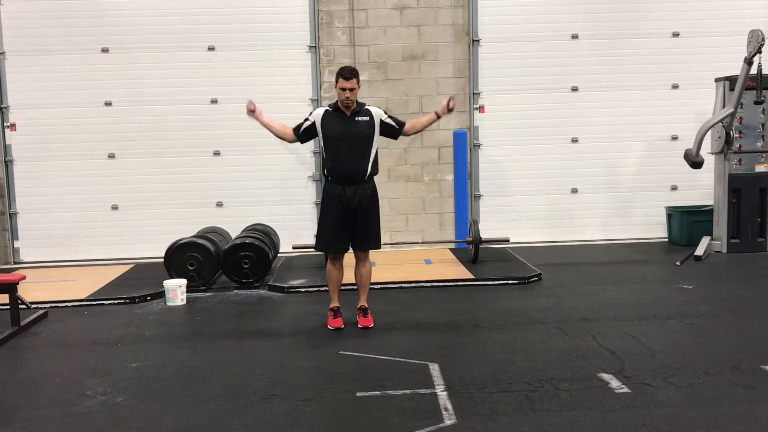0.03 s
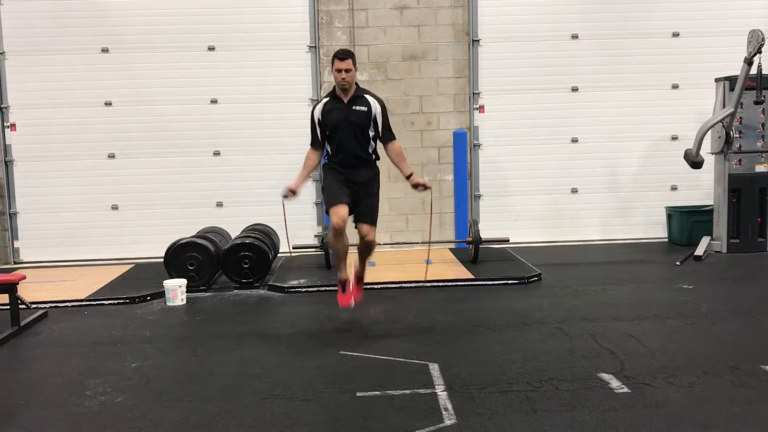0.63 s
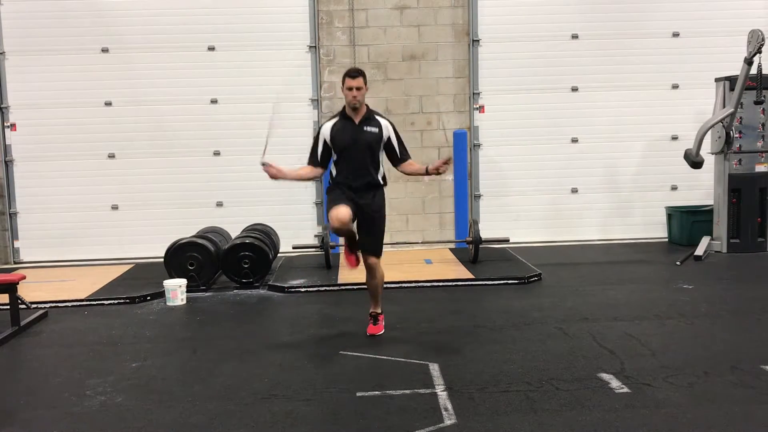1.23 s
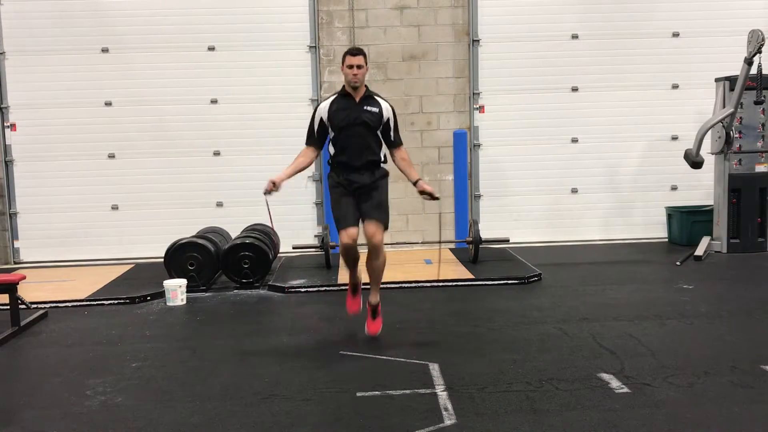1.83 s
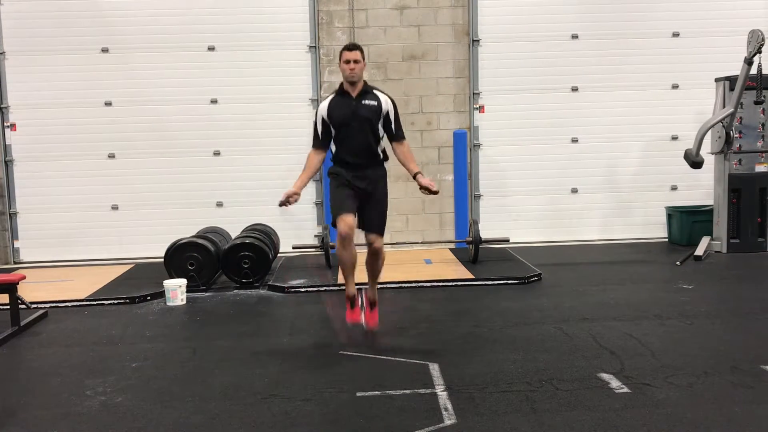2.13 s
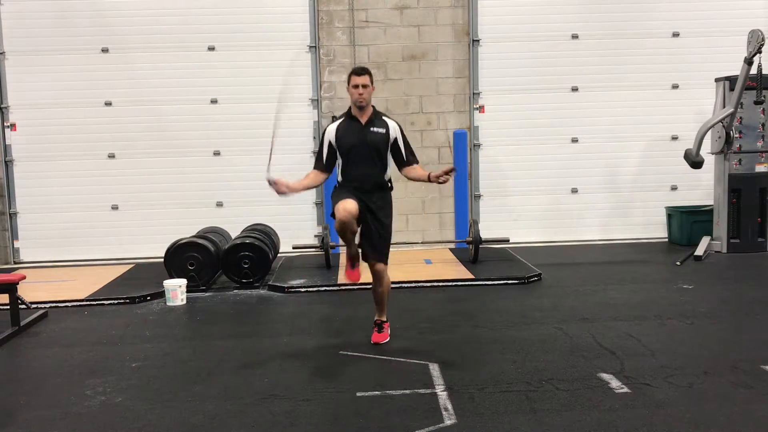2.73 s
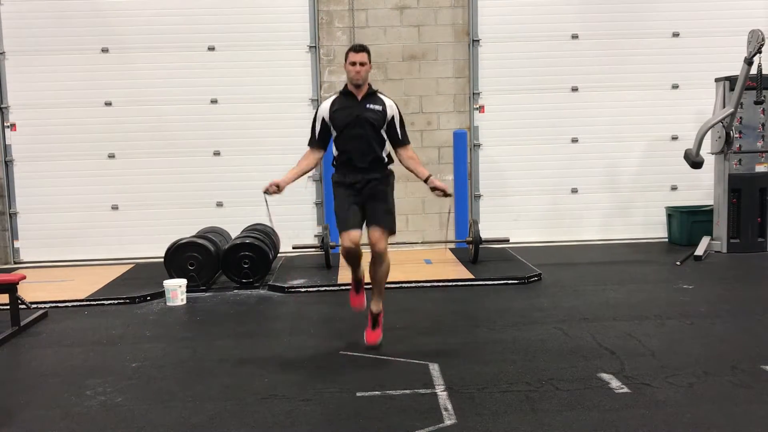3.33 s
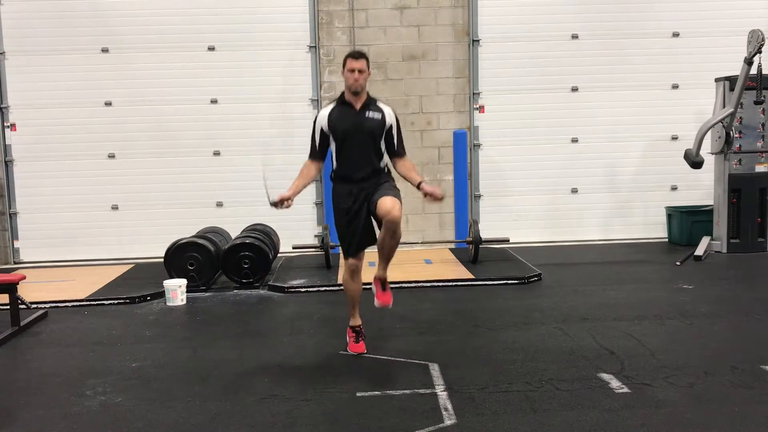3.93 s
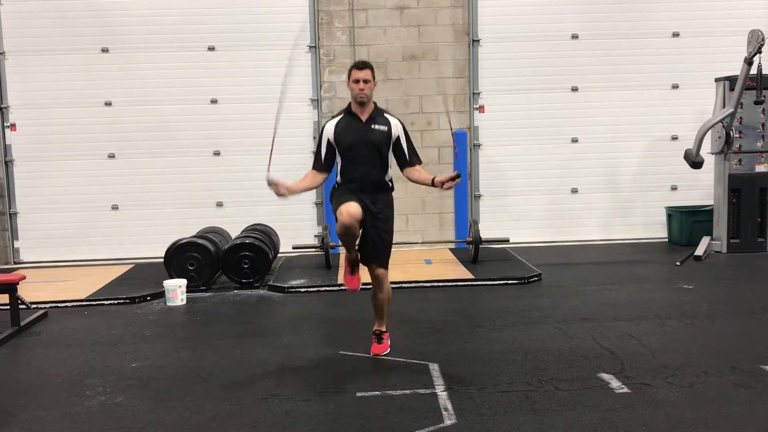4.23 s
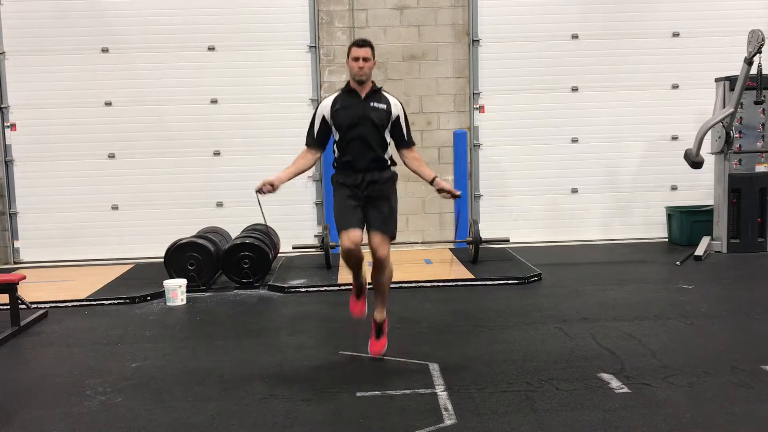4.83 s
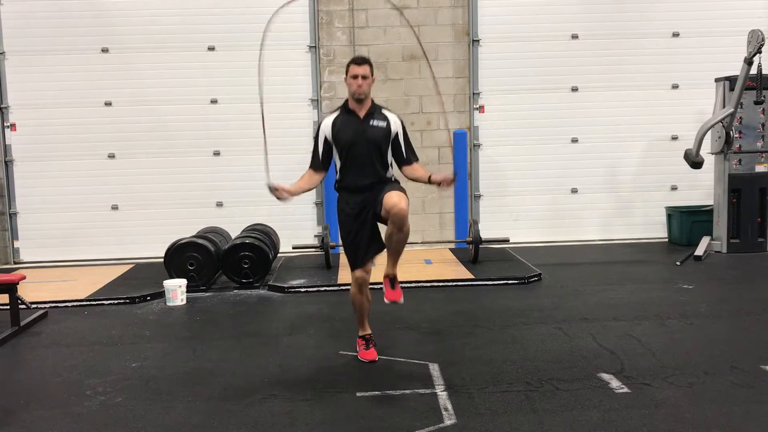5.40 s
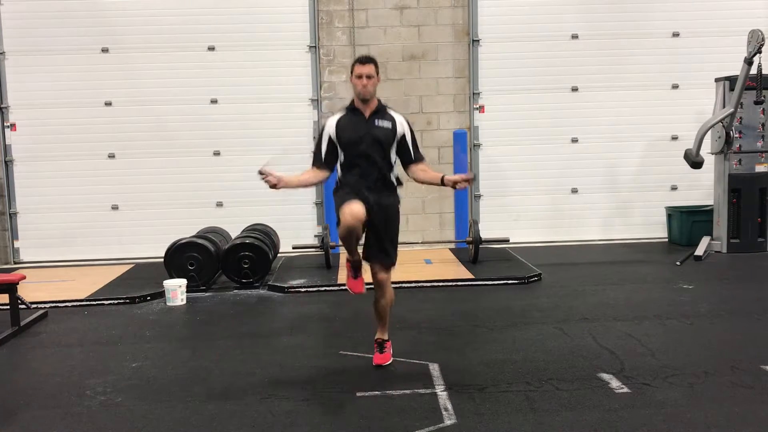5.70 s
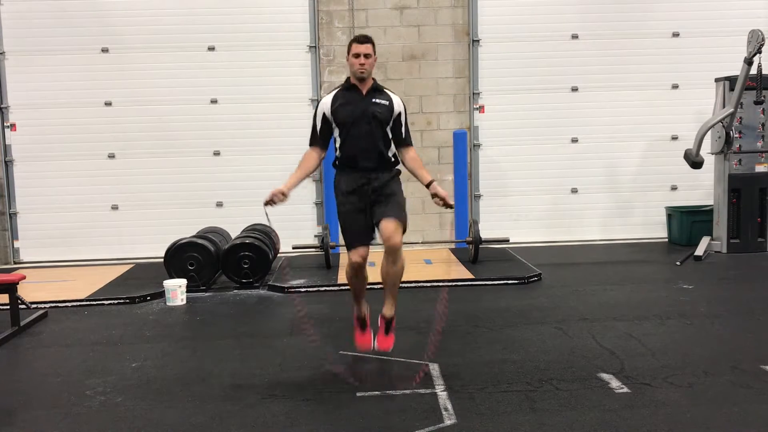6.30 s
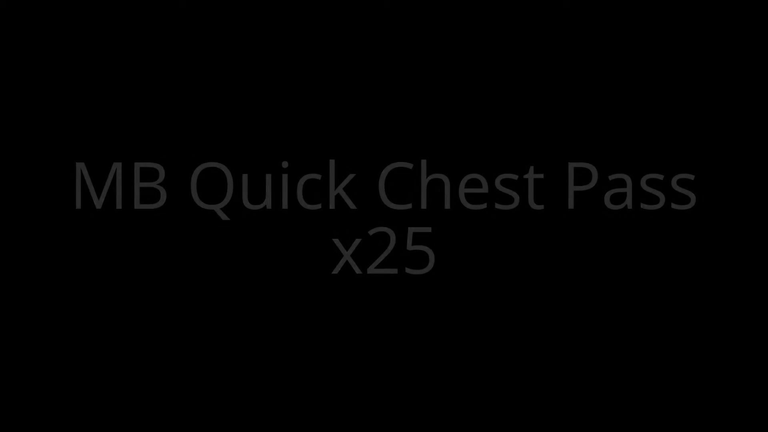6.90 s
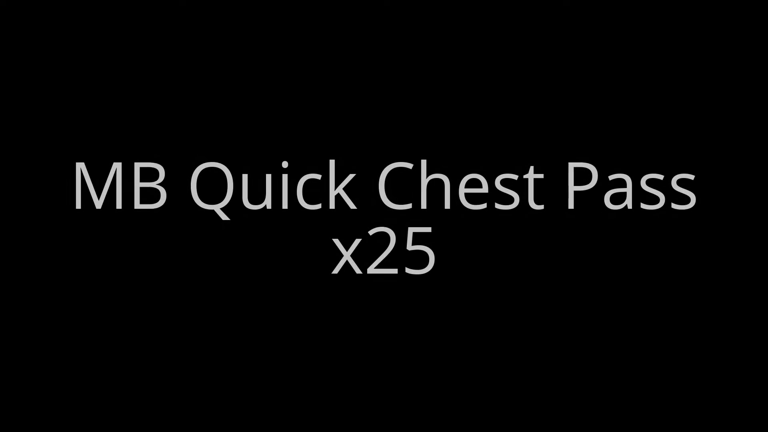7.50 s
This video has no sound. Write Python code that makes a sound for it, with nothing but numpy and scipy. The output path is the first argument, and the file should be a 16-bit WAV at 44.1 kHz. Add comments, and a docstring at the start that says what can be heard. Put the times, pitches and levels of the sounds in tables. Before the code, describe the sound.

A low ventilation hum fills a large, hard-walled gym. Someone starts skipping, and the rope whooshes, swishes down and slaps a rubber mat in an even rhythm, nearly three times a second. Soft footfalls follow most slaps, with light handle ticks and an occasional thin whistle. The microphone catches both the crisp hits and the room's echo. After sixteen turns, everything cuts off abruptly.

```python
"""A ventilation motor hums from the start in a large, hard-walled gym, where someone is skipping rope.
On each turn the rope whooshes through the air, swishes down, sometimes whistles, and slaps the rubber mat.
A soft footfall follows most slaps as the jumper steps from foot to foot, and the handles tick lightly.
The hall answers late with an echo. After sixteen turns, all the sound stops abruptly."""
import sys
import numpy as np
from scipy import signal
from scipy.fft import rfft, irfft, next_fast_len
from scipy.io import wavfile
from scipy.ndimage import uniform_filter1d

SR = 44100
rng = np.random.default_rng(int(sys.argv[2]) if len(sys.argv) > 2 else 0)


def master_out(mix):
    """Clip the mix to full scale and print it as 16-bit PCM to the path in sys.argv[1]."""
    frames = np.transpose(np.atleast_2d(mix))
    ceiling = np.clip(frames, -1, 1)
    pcm = np.round(ceiling * 32767).astype(np.int16)
    wavfile.write(sys.argv[1], SR, pcm)


N = 332955
TIME = np.arange(N) / SR
HIT_SIZE = 4096  # samples in one short hit
HIT_TIME = np.arange(HIT_SIZE) / SR
HIT_HZ = np.fft.rfftfreq(HIT_SIZE, 1 / SR)


def undb(db):
    """Turn decibels into a number to multiply by."""
    return 10 ** (np.asarray(db) / 20)


def unit(x):
    """Scale a sound to an average (rms) size of 1."""
    return x / np.sqrt(np.mean(x ** 2))


def along(points, hz):
    """Read between (pitch_hz, value) points, with octaves evenly spaced."""
    f, value = np.transpose(points)
    return np.interp(np.log(np.maximum(hz, 1)), np.log(f), value)


def bell(hz, centre_hz, width_hz):
    """A smooth hump of height 1."""
    return np.exp(-.5 * ((hz - centre_hz) / width_hz) ** 2)


def tint(x, gain):
    """Turn each frequency of a sound up or down by gain(hz)."""
    size = next_fast_len(len(x) + HIT_SIZE)
    return irfft(rfft(x, size) * gain(np.fft.rfftfreq(size, 1 / SR)), size)[:len(x)]


def noise(size, colour):
    """Steady noise with a colour: a balance of low and high pitches."""
    return unit(tint(rng.standard_normal(size), lambda f: undb(along(colour, f))))


def wander(size, width_hz):
    """A random wobble, mostly slower than width_hz."""
    return unit(tint(rng.standard_normal(size), lambda f: bell(f, 0, width_hz)))


def vortex_tone(hz, blur_hz):
    """A blurred tone: swirls of air leave the rope at a nearly regular rate."""
    phase = 2 * np.pi * np.cumsum(hz) / SR
    tone = wander(len(hz), blur_hz) * np.cos(phase) + wander(len(hz), blur_hz) * np.sin(phase)
    return tone / np.sqrt(2)


def ring(colour_db):
    """A filter of this colour that rings after a hit, never before it."""
    cepstrum = irfft(np.log(undb(colour_db)))
    return np.exp(rfft(np.r_[cepstrum[0], 2 * cepstrum[1:HIT_SIZE // 2]], HIT_SIZE))


def hit(decay_s, colour_db):
    """A burst of tiny contacts that starts 1 ms in and dies away."""
    since_s = HIT_TIME - .001
    fade = (since_s >= 0) * np.exp(-np.abs(since_s) / decay_s)
    burst = rfft(rng.standard_normal(HIT_SIZE) * fade)
    even_burst = burst / np.sqrt(uniform_filter1d(np.abs(burst) ** 2, size=100))
    return irfft(even_burst * ring(colour_db))


def add(track, start_s, sound):
    """Mix a sound into a track."""
    start = max(int(start_s * SR), 0)
    track[start:start + len(sound)] += sound[:N - start]


def taps(table, colour, decay_s, gain_db):
    """One short hit for each row of a table."""
    out = np.zeros(N)
    for start_s, level_db in table:
        add(out, start_s - .001, undb(level_db + gain_db) * hit(decay_s, along(colour, HIT_HZ)))
    return out


# Colour of the rumbling air: pitch_hz, gain_db
VENT_COLOUR = [(20, -33), (40, -4), (55, -2), (75, -5.5), (110, -2), (160, -1), (220, -10.5), (320, -16.5),
               (600, -19.5), (1100, -26.5), (2200, -34), (5000, -44.5), (10000, -52.5), (16000, -55)]
# Tones of the motor and its mains power: pitch_hz, level_db
HUM_TONES = [(41.0, -63), (58.35, -41), (116.7, -55), (120.0, -62)]
def ventilation(air_db=-44.5):
    """A slightly wavering motor hum over the steady rumble of moving air."""
    air = noise(N, VENT_COLOUR)
    hum = sum(undb(db) * np.sqrt(2) * np.sin(2 * np.pi * (hz * TIME + rng.random()))
              for hz, db in HUM_TONES)
    return air * undb(air_db + .5 * wander(N, 6)) + hum * undb(.4 * wander(N, 1))


# Colour of the echo: pitch_hz, gain_db
HALL_COLOUR = [(60, -3.5), (300, 6.5), (600, 11), (1000, 7), (3000, 9), (4300, 5), (6000, 7), (9300, 6.5),
               (11000, 2), (16000, -2)]
# Time the echo takes to fade by 60 dB: pitch_hz, fade_s
HALL_FADE = [(100, 0.61), (1000, 2.82), (3000, 1.266), (6000, 0.99), (9000, 0.83), (15000, 0.37)]
def hall(gap_s=.027, early_db=-12, wall_db=3, wall_s=.002, grain_db=3, merge_s=.098):
    """The echo of one click: weak scatter, then wall and roof together, then a fading tail."""
    t = TIME[:SR]
    f = np.fft.rfftfreq(SR, 1 / SR)
    echoes = rfft(rng.standard_normal(SR)) * undb(along(HALL_COLOUR, f)) / np.sqrt(SR)
    bands_hz, fades_s = np.transpose(HALL_FADE)
    tail = sum(irfft(echoes * along(np.c_[bands_hz, band], f)) * undb(-60 * t / fade_s)
               for band, fade_s in zip(np.eye(len(bands_hz)), fades_s))
    # the first echoes arrive one by one and only later merge
    tail *= undb(grain_db * np.exp(-t / merge_s) * wander(SR, 350))
    wall_boost = 1 + (undb(wall_db) - 1) * np.exp(-np.abs(t - gap_s) / wall_s)
    return tail * np.where(t < gap_s, undb(early_db), wall_boost)


# Ticks of the handles: start_s, relative_level_db
TICKS = [(.645, -32), (2.416, -24.5), (2.788, -15.5), (2.873, -25), (2.978, -21), (3.518, -18.5),
         (3.904, -17.5), (4.015, -33), (4.270, -17.5), (4.653, -20), (5.791, -18.5), (6.173, -18.5),
         (6.545, -21)]
# Colour of a tick: pitch_hz, gain_db
TICK_COLOUR = [(500, -27), (3000, -5), (6000, 1), (9500, 0.5), (13000, -5.5), (16000, -14)]
def handle_ticks():
    """The handles make light, bright contacts."""
    return taps(TICKS, TICK_COLOUR, decay_s=.0079, gain_db=-.5)


# Shoes landing: start_s, relative_level_db
STEPS = [(1.293, -6.5), (1.671, -14.5), (2.026, -9), (2.392, -14), (2.759, -13.5), (3.51, -11.5),
         (3.887, -12.5), (4.258, -7.5), (4.643, -19.5), (5.009, -9.5), (5.398, -13), (5.779, -8.5),
         (6.155, -8.5), (6.528, -6.5)]
# Colours of the sole's tap and the deep thud: pitch_hz, gain_db
SOLE_COLOUR = [(150, -5), (400, 1), (800, 3), (1600, -1.5), (2500, -11), (5000, -16.5), (15000, -26.5)]
THUD_COLOUR = [(40, -9.5), (80, 8), (160, 9), (350, 3.5), (700, -5), (3000, -39)]
def footfalls():
    """The sole taps the rubber and the jumper's weight adds a longer thud."""
    sole = taps(STEPS, SOLE_COLOUR, decay_s=.003, gain_db=-1)
    thud = taps(STEPS, THUD_COLOUR, decay_s=.021, gain_db=-4)
    return sole + thud


# The whoosh as the jumper's effort rises and eases: time_s, pitch_hz, relative_level_db
SWING = [(0.0, 263, -57.5), (1.0, 261, -54), (1.19, 371, -44), (1.48, 283, -50), (1.52, 371, -48),
         (1.59, 333, -47), (3.14, 321, -47), (3.27, 297, -53.5), (3.37, 405, -46.5), (3.45, 300, -49.5),
         (3.6, 367, -41), (3.71, 317, -48.5), (6.1, 309, -47), (6.36, 299, -51), (6.4, 332, -46.5),
         (6.8, 296, -51.5)]
def whoosh(blur_hz=22, bend=.07, bend_lead_s=.03, swell_db=1, swell_lead_s=.051, gain_db=-2):
    """The loop stirs the air: its fast middle sings highest, its slower sides lower."""
    time_s, hz, db = np.transpose(SWING)
    landings_s = np.transpose(SLAPS)[0]  # one turn per slap, listed below
    angle = lambda lead_s: 2 * np.pi * np.interp(TIME + lead_s, landings_s, np.arange(len(SLAPS)))
    # the rope is fastest just before it lands, so the pitch bends up once a turn
    pitch_hz = np.interp(TIME, time_s, hz) * (1 + bend * np.cos(angle(bend_lead_s)))
    # it swells twice a turn, going down and going up
    level_db = np.interp(TIME, time_s, db) + swell_db * np.cos(2 * angle(swell_lead_s))
    loop_parts = [(.8, -4), (.97, -1), (1.12, -2), (1.27, -5)]
    air = sum(undb(part_db) * vortex_tone(ratio * pitch_hz, blur_hz) for ratio, part_db in loop_parts)
    return unit(air) * undb(level_db + gain_db)


# Colour of the rope's hiss: pitch_hz, gain_db
HISS_COLOUR = [(2000, -4), (4000, 0.5), (6800, 2), (8500, -2.5), (11000, -7), (13000, -3), (16000, -14.5)]
# Thin whistles: start_s, length_s, first_pitch_hz, last_pitch_hz, level_db
WHISTLES = [(1.47, .11, 5900, 5370, -60), (2.618, 0.057, 6300, 5470, -57.5), (3.02, 0.031, 6000, 5720, -61),
            (4.11, 0.064, 5900, 5070, -56), (4.885, .04, 5800, 5300, -57), (6.385, 0.063, 5950, 4730, -56)]
def downswings(swish_s=.092, first_hz=6340, last_hz=5400, hiss_db=-2, hiss_hall_db=5):
    """The rope swishes down in falling pitch and sometimes whistles; returns (direct, to the hall)."""
    tone, hiss = np.zeros(N), np.zeros(N)
    swell = lambda size: np.sin(np.pi * np.linspace(0, 1, size) ** 1.3)
    size = int(swish_s * SR)
    for landing_s, *_, swish_db in SLAPS:
        loudness = undb(swish_db) * swell(size)
        swish = vortex_tone(np.linspace(first_hz, last_hz, size), blur_hz=600)
        add(tone, landing_s - swish_s, loudness * swish)
        add(hiss, landing_s - swish_s, loudness * noise(size, HISS_COLOUR))
    for start_s, length_s, from_hz, to_hz, level_db in WHISTLES:
        size = int(length_s * SR)
        whistle = vortex_tone(np.linspace(from_hz, to_hz, size), blur_hz=140)
        add(tone, start_s, undb(level_db) * swell(size) * whistle)
    return tone + undb(hiss_db) * hiss, tone + undb(hiss_hall_db) * hiss


# Colour of a slap: pitch_hz, gain_db
SLAP_COLOUR = [(150, -13), (400, -1.5), (800, 2), (2400, 0), (3600, 1), (6000, -1), (9000, -1.5),
               (12000, 0), (15000, 2.5)]
# The rope landing on the mat, once a turn (levels are relative):
# start_s, level_db, contact_s, smack_pitch_hz, body_db, snap_db, swish_db
SLAPS = [(0.7332, -7.5, .0028, 1213, -1.5, -5, -78), (1.203, -5, .0036, 1550, -4, -1, -57),
         (1.5778, -9, .002, 1440, -4, 0, -60), (1.946, -9.5, .0013, 1150, 1, 1, -58.5),
         (2.3162, -7.5, .002, 1500, 1, 3.5, -65), (2.6833, -3, .001, 1630, 1, -10, -59.5),
         (3.0567, -1.5, .0011, 1740, -2, -12.5, -59.5), (3.4207, -4.5, .006, 1406, 0.5, 0, -59),
         (3.7935, -4, .0022, 1450, -0.5, -1, -61), (4.172, -4.5, .0008, 1460, 3, 5, -58.5),
         (4.5453, -5, .0028, 1250, 2.5, -5, -66), (4.923, -3, .001, 1440, 1.5, 4.5, -61.5),
         (5.311, -6.5, .0024, 1620, 1.5, 2, -61.5), (5.6925, -6, .001, 1400, -1.5, 2, -62.5),
         (6.0743, -2, .0013, 1400, -1, 1, -60.5), (6.4459, -3.5, .0031, 1620, 1.5, -4, -62.5)]
def slaps(crackle_db=-5, crackle_s=.008, direct_db=-1, hall_db=-1.31, hall_follows=.37, clack_hz=3000):
    """The rope snaps on the mat, more of it lands, the rest lies down in a crackle; the hall answers."""
    out = np.zeros(N)
    lows = 1 / (1 + (HIT_HZ / 2200) ** 4)
    top_cut_db = -5 * (1 - 1 / (1 + (HIT_HZ / 10000) ** 8))
    colour = along(SLAP_COLOUR, HIT_HZ)
    snap_colour = along([(3000, -21), (8000, -18.5), (11500, -4.5), (15000, -2)], HIT_HZ)
    for start_s, level_db, contact_s, smack_hz, body_db, snap_db, _ in SLAPS:
        smack_db = 4 * bell(HIT_HZ, smack_hz, width_hz=330) + body_db * lows
        body_colour = colour + smack_db + top_cut_db
        snap = hit(.0003, snap_colour + snap_db)
        landing = hit(contact_s, body_colour)
        crackle = hit(crackle_s, body_colour + crackle_db)
        add(out, start_s - .001, undb(level_db + direct_db) * (snap + landing + crackle))
        # the duller the snap, the more its echo clacks
        clack_db = -.27 * snap_db * bell(HIT_HZ, clack_hz, width_hz=800)
        # the hall hears the slap from all sides, so its answer varies less
        to_hall = irfft(ring(colour + .38 * smack_db + clack_db))
        echo = signal.fftconvolve(to_hall, hall())
        add(out, start_s, undb(hall_db + hall_follows * level_db) * echo)
    return out


def scene(steps_hall_db=-5, ticks_hall_db=-2, air_hall_db=-2):
    """Rope, shoes and handles, heard directly and as echoes, over the ventilation."""
    steps = footfalls()
    ticks = handle_ticks()
    air = whoosh()
    swish, swish_to_hall = downswings()
    to_hall = undb(steps_hall_db) * steps + undb(ticks_hall_db) * ticks + undb(air_hall_db) * air
    echo = signal.fftconvolve(to_hall + swish_to_hall, hall())[:N]
    return (slaps() + steps + ticks + air + swish + echo + ventilation())[None]


# Pitches weakened by the microphone's opening: pitch_hz, width_hz, gain_db
MIC_DIPS = [(4900, 250, -3.5), (7670, 820, -4), (10460, 350, -5.5)]
def record(dry, stop_s=6.809, fade_s=.004, top_hz=15900):
    """The microphone's opening colours the treble; the sound is switched off and its top is cut."""
    heard = tint(dry[0], lambda f: undb(sum(db * bell(f, hz, width / 2) for hz, width, db in MIC_DIPS)))
    heard *= np.clip((stop_s - TIME) / fade_s, 0, 1)
    return tint(heard, lambda f: 1 / np.sqrt(1 + (f / top_hz) ** 200))[None]


dry = scene()
out = record(dry)
master_out(out)
```